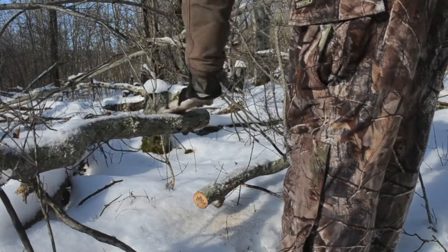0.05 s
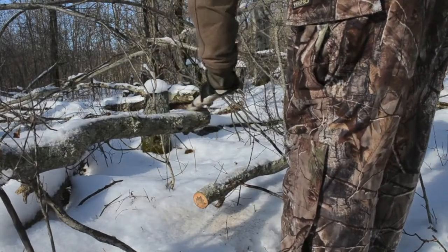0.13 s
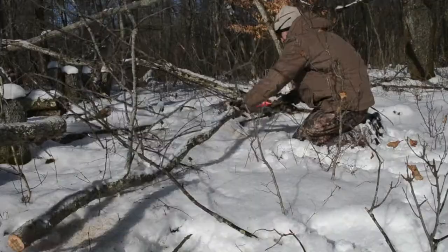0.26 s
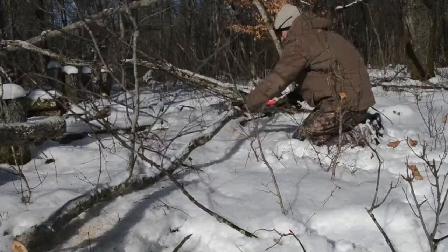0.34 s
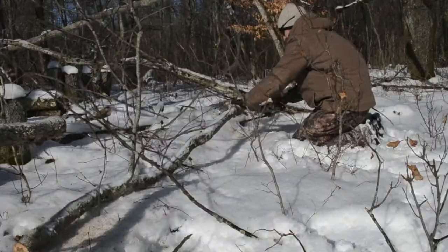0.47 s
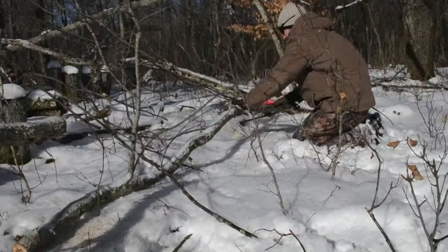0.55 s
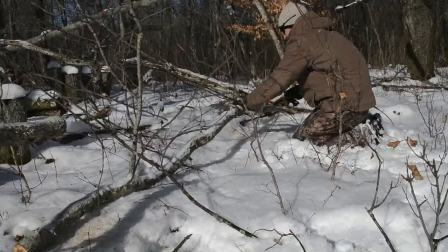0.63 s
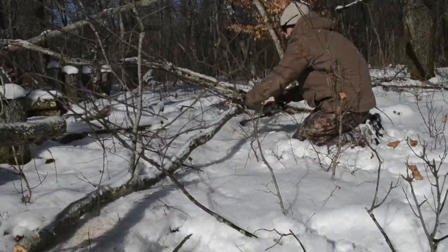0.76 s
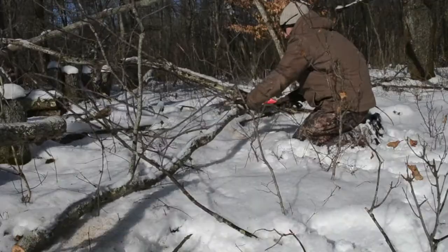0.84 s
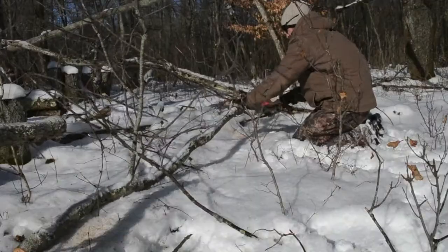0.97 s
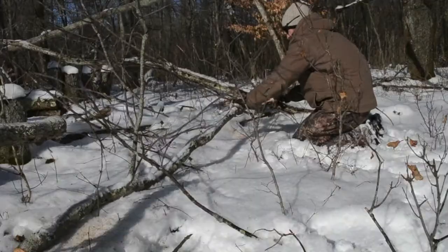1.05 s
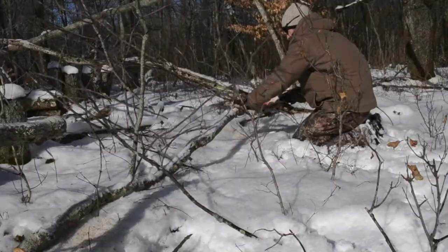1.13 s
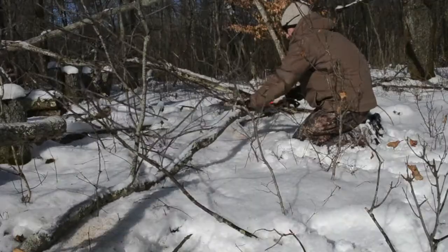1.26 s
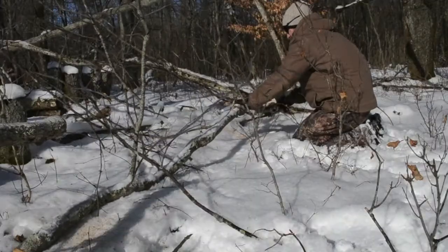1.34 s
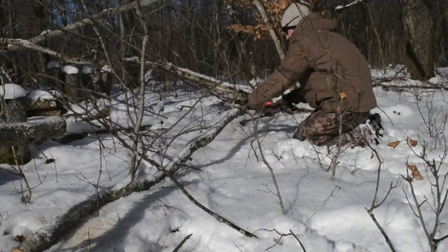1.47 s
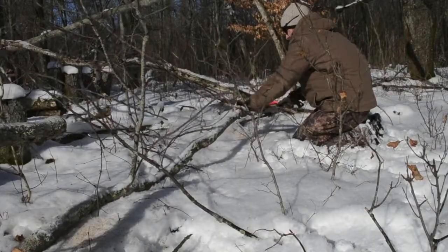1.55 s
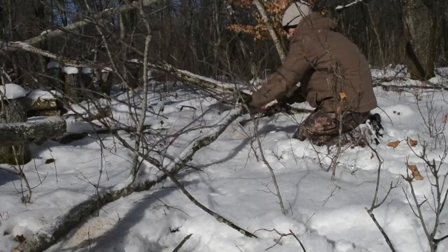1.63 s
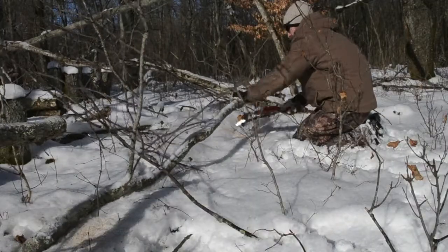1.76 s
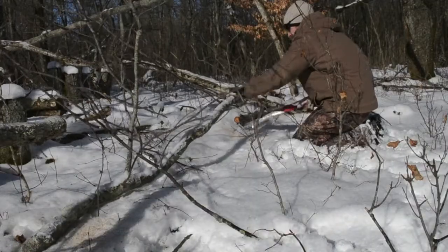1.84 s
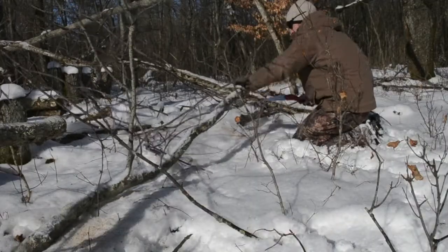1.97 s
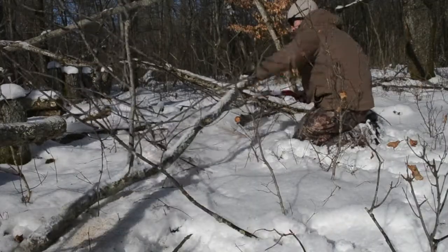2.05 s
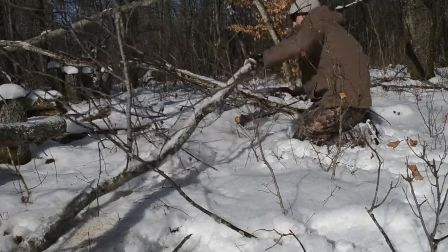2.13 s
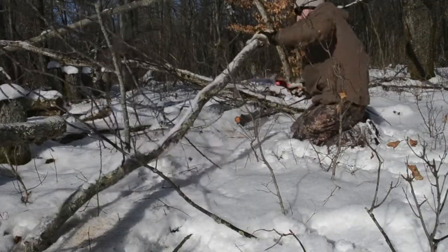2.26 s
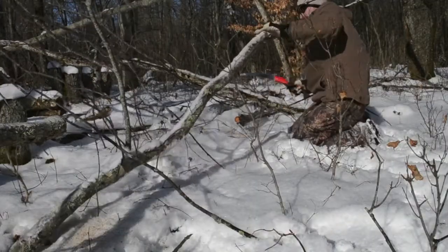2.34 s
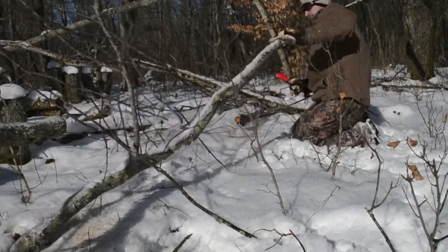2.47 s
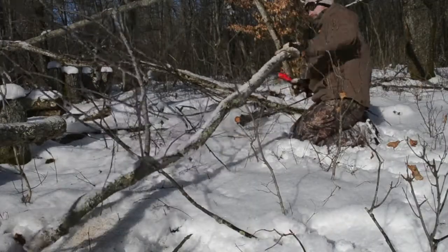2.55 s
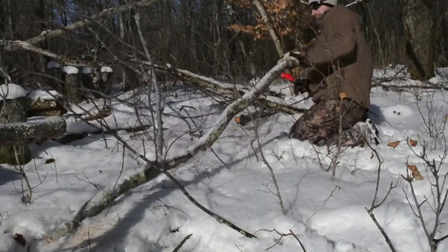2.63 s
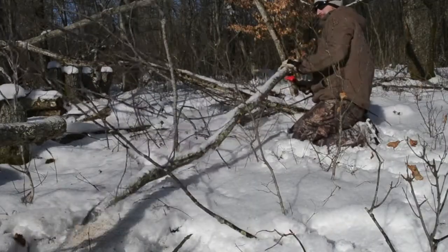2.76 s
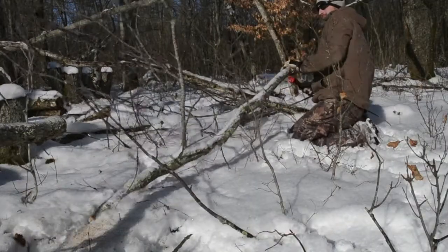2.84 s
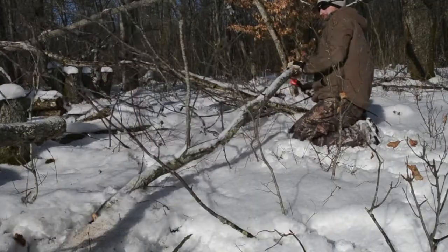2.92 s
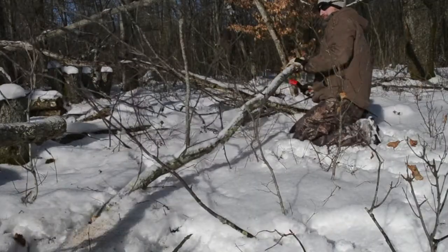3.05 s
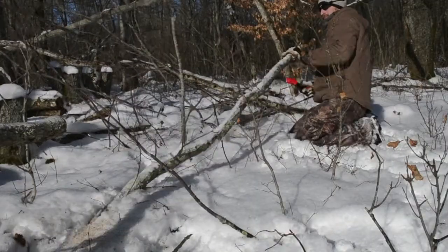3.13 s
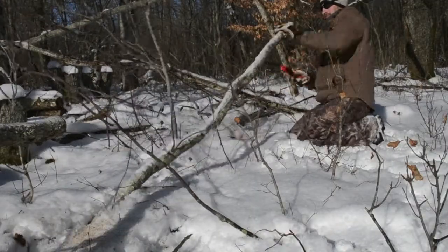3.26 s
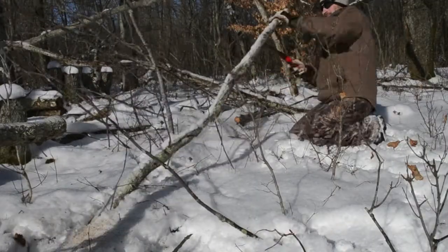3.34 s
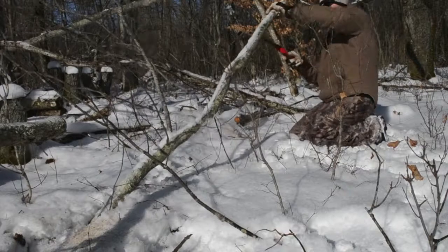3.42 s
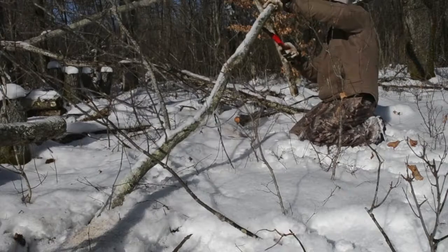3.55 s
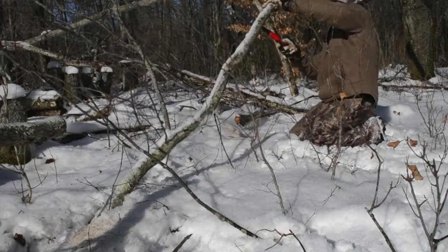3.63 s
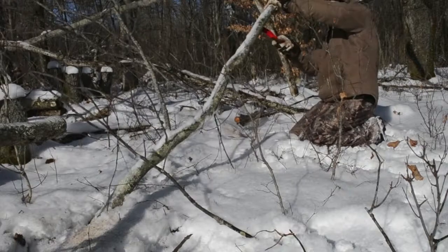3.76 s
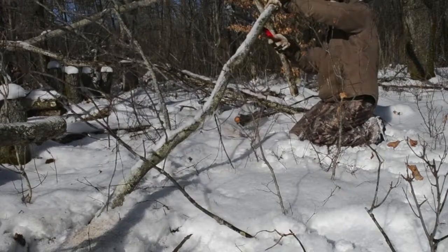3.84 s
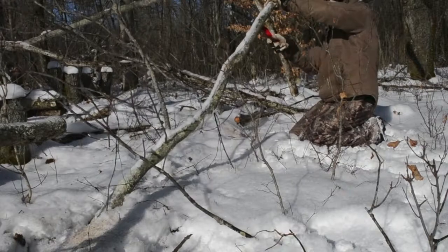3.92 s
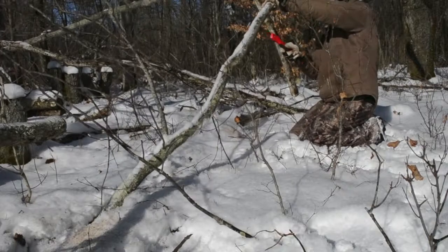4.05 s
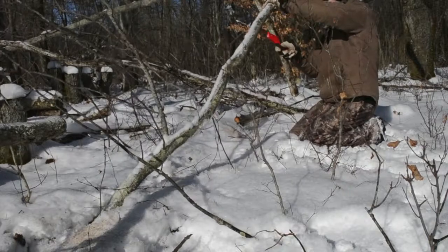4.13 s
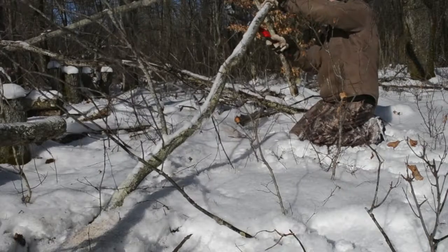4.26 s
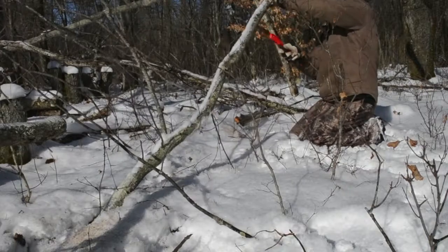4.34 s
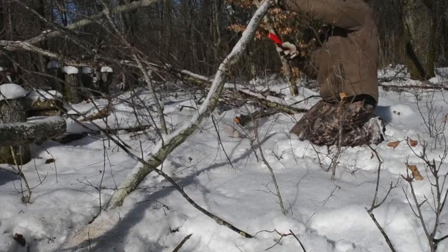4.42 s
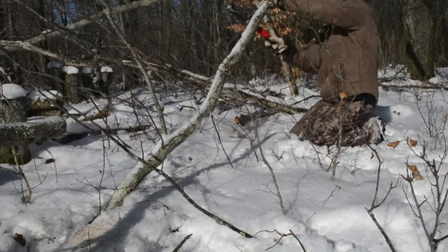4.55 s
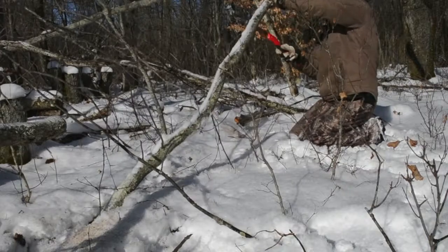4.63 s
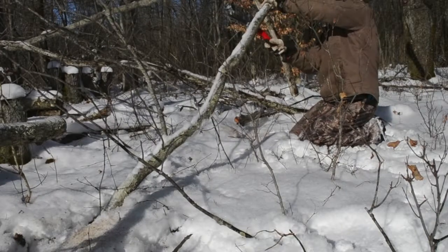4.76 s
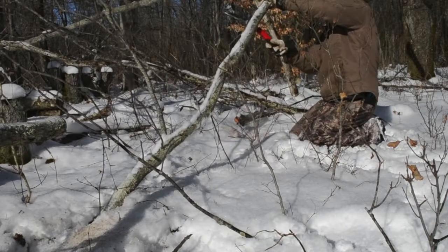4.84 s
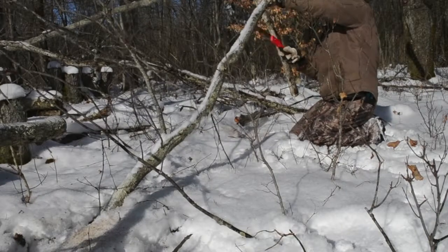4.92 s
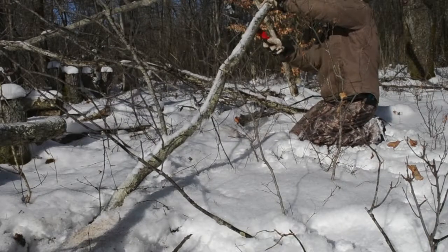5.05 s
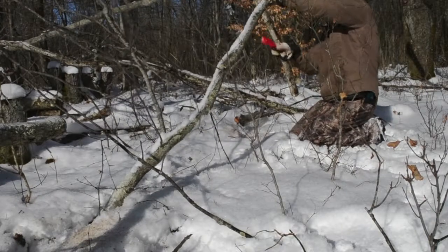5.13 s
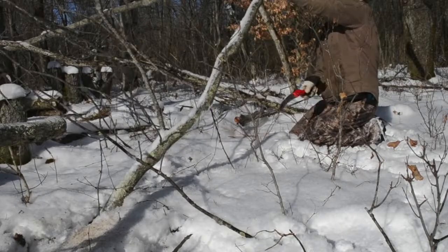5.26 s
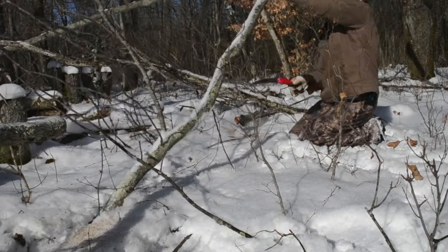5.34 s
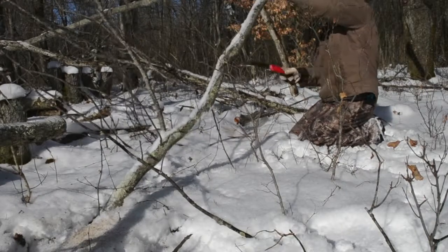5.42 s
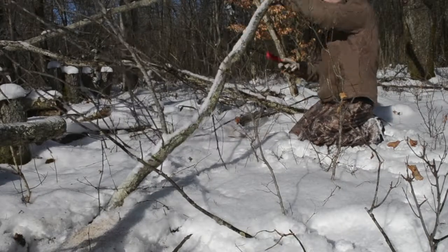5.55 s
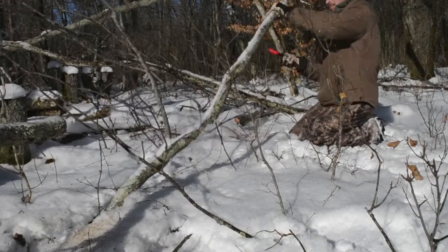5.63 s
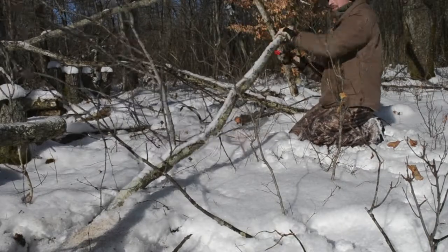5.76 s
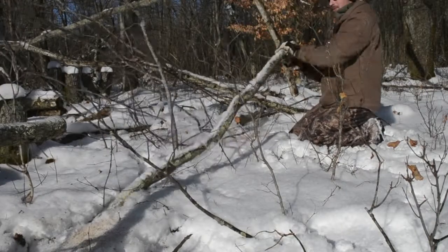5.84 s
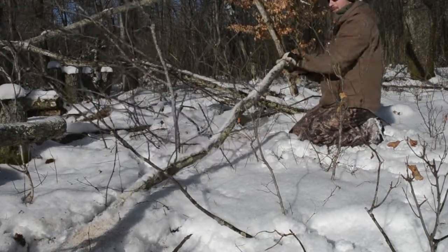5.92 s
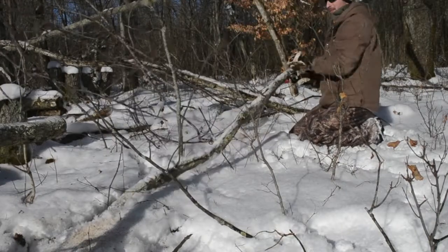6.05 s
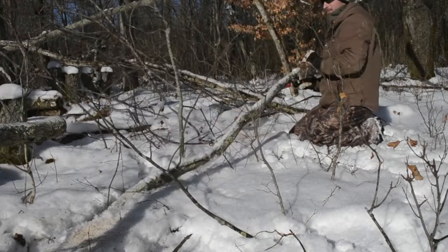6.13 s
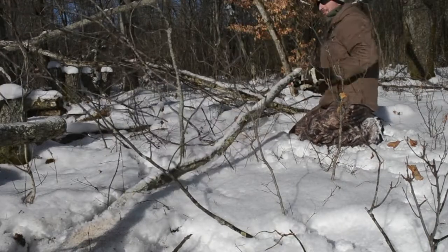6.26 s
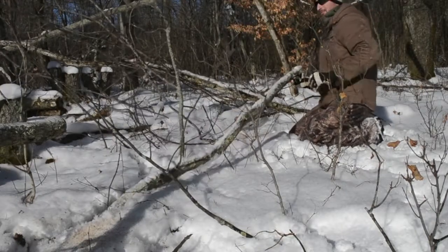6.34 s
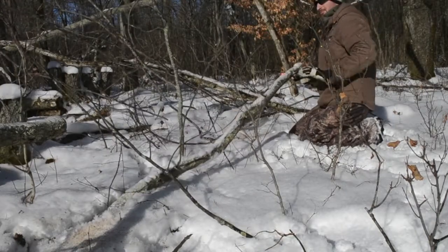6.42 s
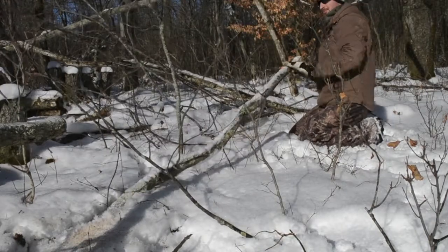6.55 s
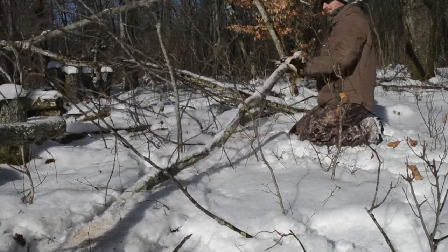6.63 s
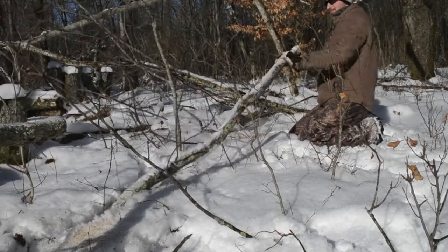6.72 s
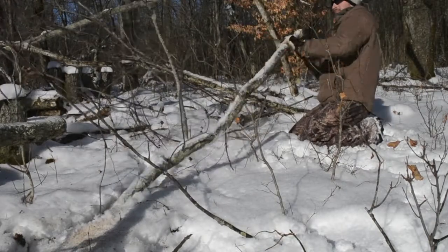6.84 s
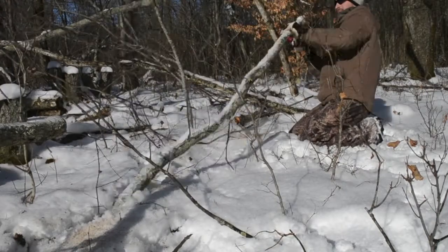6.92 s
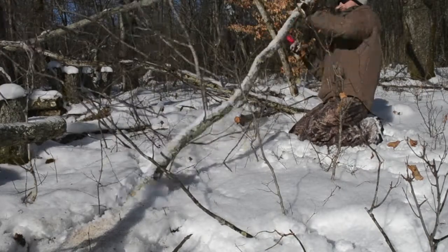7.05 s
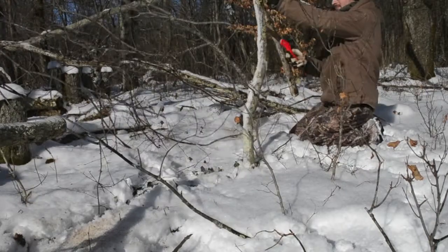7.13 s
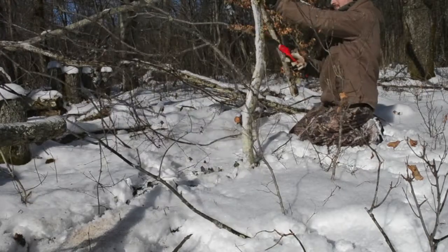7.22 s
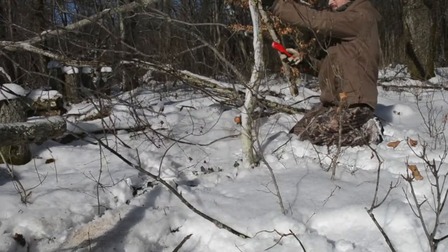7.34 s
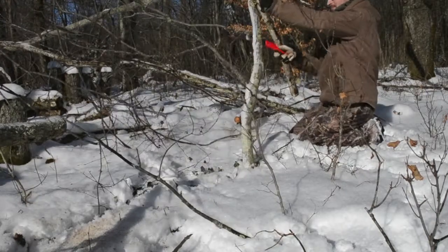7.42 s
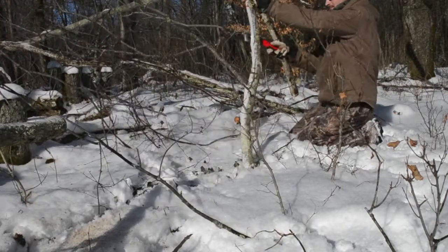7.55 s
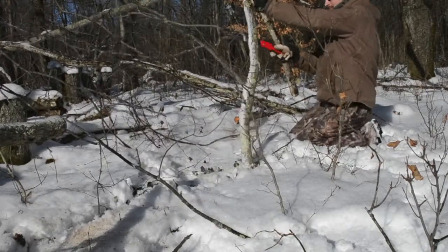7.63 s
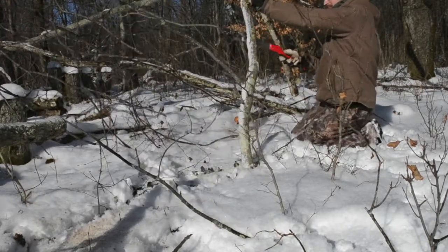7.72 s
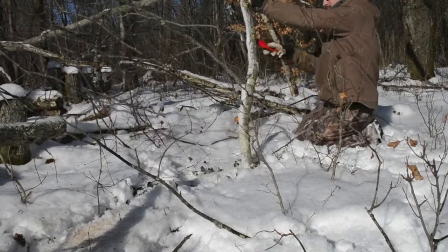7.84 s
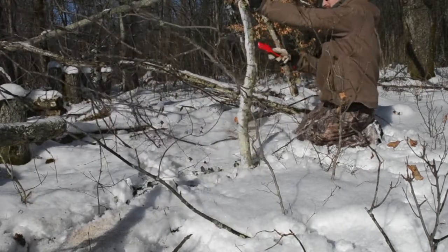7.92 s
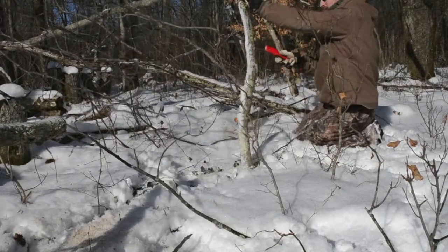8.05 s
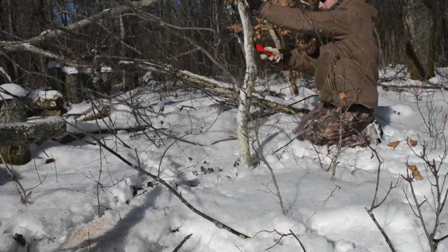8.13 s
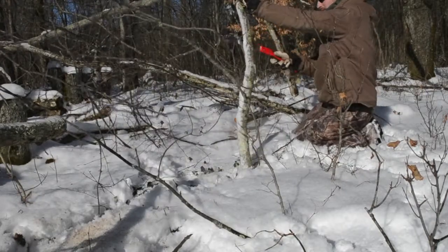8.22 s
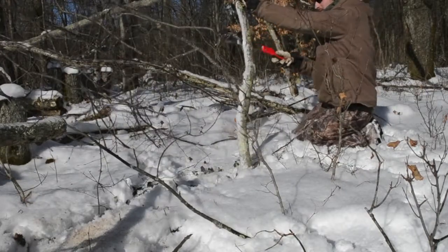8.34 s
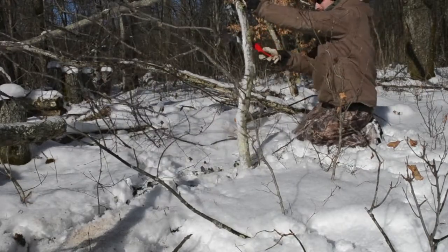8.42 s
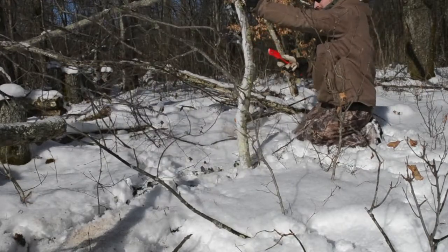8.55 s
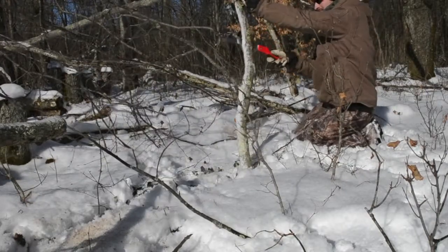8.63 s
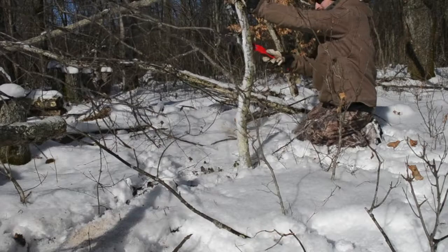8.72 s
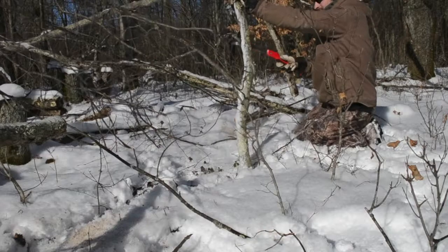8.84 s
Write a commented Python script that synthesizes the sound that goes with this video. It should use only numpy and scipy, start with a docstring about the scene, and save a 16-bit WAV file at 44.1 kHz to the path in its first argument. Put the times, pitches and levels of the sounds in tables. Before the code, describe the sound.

Quick back-and-forth sawing on a branch outdoors, pausing twice for cloth rustle, wood scraping on snow and sharp twig snaps.

```python
"""Folding saw on a dead branch in snowy woods: three cuts of quick pull and push strokes.
Teeth tear fibres and ring branch and blade. In the first two cuts each push groans; in the first
the blade also binds and jumps with loud cracks. Between cuts the branch is hauled over snow: a stiff
jacket swishes, twigs snap, wood knocks and creaks, the thin blade pings.
Faint air and a far drone behind; almost no echo."""
import sys
import numpy as np
from scipy import signal
from scipy.fft import rfft, irfft
from scipy.io import wavfile
from scipy.ndimage import uniform_filter1d

SR = 44100
rng = np.random.default_rng(int(sys.argv[2]) if len(sys.argv) > 2 else 0)


def wrap_up_sound(samples):
    """Save the sound to the file named by the first command line argument, as 16-bit audio."""
    columns = np.atleast_2d(samples).T
    # keep every value between -1 and 1, then stretch to whole-number steps
    tamed = np.clip(columns, -1, 1)
    steps = np.round(tamed * 32767).astype(np.int16)
    wavfile.write(sys.argv[1], SR, steps)


N = 391588
NFFT = 4096
HZ = np.fft.rfftfreq(NFFT, 1 / SR)
T = np.arange(N) / SR

# spectral envelopes (frequency [Hz], level [dB])
AIR_EQ = [(25, -22), (60, -15), (150, -10.5), (280, -8), (420, -8), (560, -4.5), (1000, -4.5), (2500, -25),
          (6000, -30), (10000, -16)]
ECHO_EQ = [(100, 4), (500, -1), (1200, -8.5), (2200, 0), (3500, -5.5), (9000, -12)]
SWISH_EQ = [(30, -33), (100, -19), (200, -11), (400, -10.5), (800, 1), (1200, 0.5), (1650, 3), (2400, 0.5),
            (4000, -0.5), (7000, -3.5), (9000, -4.5), (11000, -4.5), (13000, -59)]
SNAP_EQ = [(100, -30), (500, -6.5), (1400, -4), (3000, -4.5), (6000, -1.5), (9000, -3.5), (11000, -2.5),
           (13000, -21)]
KNOCK_EQ = [(50, -36), (160, -31), (330, -3), (500, 6), (750, 9), (1100, 1), (1600, -5.5), (2500, -14.5),
            (5000, -8), (11000, -98)]
CRACK_EQ = [(50, -43), (160, -21), (400, -12.5), (700, -7.5), (1200, -1.5), (2200, -4.5), (3700, -5),
            (4600, -4.5), (7000, -7.5), (10000, -7)]
RASP_EQ = [(40, -27), (90, -20.5), (160, -9), (280, -11.5), (450, -3), (900, 3), (1700, 4.5), (2500, 4.5),
           (4000, -3.5), (6000, -4), (7500, -4), (9000, -3), (11000, -5), (13000, -82)]
MIC_EQ = [(20, 2.5), (7300, -1), (7900, -5.5), (8300, -0.5), (9500, 0.5), (10200, -7.5), (10800, -18.5),
          (11300, -39)]

# resonances (frequency [Hz], width [Hz], lift [dB])
HUM_MODES = [(420, 155, 8)]
BLADE_MODES = [(4480, 150, 3), (4920, 150, 5.5), (5270, 150, 4.5), (5750, 140, 4.5), (6530, 150, 4.5),
               (7100, 180, 2), (8450, 400, 3), (9300, 350, 3)]
JUMP_MODES = [(904, 340, 16), (1520, 86, 3), (2020, 160, 13), (2430, 220, 12), (3400, 230, 7.5),
              (3670, 270, 10.5)]  # branch, struck by the jumping blade
BRANCH_MODES_1 = [(425, 180, 17), (810, 150, 9.5), (1010, 130, 11), (1560, 140, 9), (2100, 120, -15),
                  (5270, 1800, 6)]  # one set per cut: the branch gets shorter
BRANCH_MODES_2 = [(440, 50, 4.9), (824, 170, 13.8), (1028, 34, 20.3), (1382, 130, 17.5), (1640, 330, 10),
                  (2520, 160, 8.6), (3330, 300, 1.1)]
BRANCH_MODES_3 = [(445, 31, 8.4), (783, 27, 12.4), (1010, 91, 15), (1430, 220, 6.1), (1790, 200, 9.7),
                  (2250, 180, 2.3), (2570, 78, 2.7), (7970, 600, 1.3)]

# far drone (time [s], pitch [Hz])
DRONE_PITCH = [(0, 440), (2.0, 438), (5.4, 415), (6.2, 383), (7.4, 396), (8.88, 420)]
# arm and branch movements (start [s], length [s], relative level [dB], treble re body [dB])
HAULS = [(-0.2, 0.51, -51.5, 3.5), (0.158, 0.06, -47, -4.5), (1.59, 0.3, -60, 3), (1.803, 0.98, -52.5, -2),
         (2.334, 0.77, -45.5, -0.5), (3.022, 0.31, -53.5, -2), (3.129, 0.57, -53, 2),
         (3.77, 0.16, -57, -12), (5.084, 0.16, -46.5, -5.5), (5.022, 0.64, -58.5, 1),
         (5.591, 0.13, -52, -3), (5.61, 0.63, -56.5, -2), (6.483, 0.27, -55, -3.5),
         (6.728, 0.45, -47.5, -3.5), (7.017, 0.11, -47.5, 1), (7.15, 0.4, -74, 9), (7.38, 0.2, -57.5, -16)]
# wood pinching the blade or dragged over wood (start [s], length [s], initial pitch [Hz], level [dB])
CREAKS = [(4.436, 0.036, 1050, -41.5), (5.628, 0.054, 1300, -54), (5.92, 0.025, 1270, -51),
          (5.983, 0.054, 1070, -55), (6.514, 0.04, 1250, -56)]
# blade pings and wood chirps (time [s], pitch [Hz], relative level [dB], t60 [s])
PINGS = [(1.625, 4930, -38.5, 0.093), (1.672, 4900, -44, 0.15), (1.752, 4900, -46, 0.18),
         (2.511, 1630, -31, 0.034), (2.992, 2000, -40, 0.044), (3.876, 1580, -36.5, 0.029),
         (5.176, 6300, -41, .12), (5.640, 1940, -42, 0.062), (7.452, 5620, -52, 0.16),
         (7.454, 4930, -47, 0.097)]
# twigs breaking, teeth catching (time [s], impulse level [dB], splinter re impulse [ratio])
SNAPS = [(0.784, -27.5, 0.18), (0.92, -30.5, 0.08), (1.286, -32, 0.087), (1.6282, -27, .1),
         (1.6703, -20, 0.25), (1.6929, -12.5, 0.059), (2.109, -31.5, .1), (2.221, -22, 0.086),
         (2.3997, -23, 0.11), (2.507, -24, 0.087), (2.9743, -27, 0.15), (3.1036, -33, 0.15),
         (3.4038, -24.5, .08), (3.475, -23, 0.083), (3.7258, -26, 0.11), (3.9148, -19, 0.052),
         (5.176, -21.5, 0.19), (5.2677, -26.5, 0.1), (5.892, -24.5, 0.043), (6.2638, -33.5, 0.11),
         (6.676, -14.5, .04), (6.926, -20, 0.13), (7.4266, -30, 0.11), (7.9149, -23.5, 0.15),
         (8.0698, -26, 0.11), (8.1998, -22, 0.12), (8.6333, -29, .12)]
# handle and wood knocks (time [s], relative level [dB], pitch [ratio])
KNOCKS = [(0.3119, -38, 1.08), (.584, -38.5, 1.25), (1.231, -36, 1.6), (1.399, -44, 0.7),
          (1.657, -49, 0.38), (2.511, -45.5, 3.9), (3.226, -58, 0.21), (3.851, -51.5, 0.98),
          (4.222, -39, 1.08), (4.516, -33.5, 1.13), (4.797, -37.5, 1.3), (5.088, -40, 1.12),
          (5.114, -41.5, 1.9), (5.292, -49.5, 1.37), (6.466, -54, 1.7), (6.506, -44.5, 1.84),
          (6.677, -33.5, 1.86), (6.926, -42.5, 2.1), (7.079, -50, 1.8)]
# bound blade chattering free (time [s], relative level [dB], hold [s])
JUMPS = [(0.311, -38, 0.0056), (0.5815, -23, 0.0037), (0.8634, -29, 0.0056), (1.2012, -32.5, 0.0061),
         (1.228, -30.5, 0.004), (1.66, -45.5, 0.02)]
# brief level dips (centre [s], depth [dB], half width [s])
DIPS = [(.266, 44, .019), (7.151, 26, .013)]

# strokes per cut, alternating, pull first (blade turn [s], effort [dB])
CUT_1 = [(0.278, -54), (0.35, -49), (0.488, -45), (0.655, -49.5), (0.762, -45.5), (0.93, -54.5),
         (1.098, -51), (1.29, -55), (1.422, -48), (1.57, -55.5)]
CUT_2 = [(3.955, -43), (4.108, -46), (4.257, -39.5), (4.413, -44), (4.548, -40.5), (4.696, -45),
         (4.821, -38), (4.972, -41.5)]
CUT_3 = [(7.61, -45.5), (7.765, -48), (7.895, -43.5), (8.042, -48.5), (8.178, -43), (8.326, -45),
         (8.456, -44.5), (8.602, -45.5), (8.724, -43.5)]
# pull row, push row: a pull bites, a push rides on the wood and thrums; levels re effort
# (speed peak [share of stroke], branch thrum [dB], wood rasp [dB], tooth hiss [dB])
FEEL_1 = [(.4, -13.5, 0, 1.5), (0.561, -4, 1, 2.5)]
FEEL_2 = [(.64, -15, -0.11, 0.6), (.62, -13.5, -0.53, -0.5)]
FEEL_3 = [(.6, -15.5, -.2, 4.46), (.62, -9.5, -0.23, 2.9)]


def gain_of(db):
    """dB to amplitude."""
    return 10 ** (np.asarray(db) / 20)


def unit_rms(x):
    """Scale to rms 1."""
    return x / np.sqrt(np.mean(x ** 2) + 1e-20)


def add(mix, start_s, sound):
    """Mix a sound in, in place."""
    part = mix[max(round(start_s * SR), 0):][:len(sound)]
    part += sound[:len(part)]


def spectrum(points, pitch=1):
    """Gain curve from (Hz, dB) points, frequencies scaled by pitch."""
    hz, db = np.transpose(points)
    return gain_of(np.interp(np.log(HZ + 1), np.log(hz * pitch + 1), db))


def resonances(modes):
    """Gain curve of peaks on a flat response."""
    peaks = sum(gain_of(2 * db) / (1 + (2 * (HZ - hz) / width_hz) ** 2) for hz, width_hz, db in modes)
    return np.sqrt(1 + peaks)


def ripple(depth_db, spacing_hz):
    """Random gain curve of many close, weak modes."""
    knots_hz = np.arange(0, SR / 2, spacing_hz)
    return gain_of(depth_db * np.interp(HZ, knots_hz, rng.standard_normal(len(knots_hz))))


def ring(gain):
    """Minimum-phase impulse response of a gain curve."""
    log_gain = np.log(np.maximum(gain, 1e-5))
    mirrored = np.concatenate([log_gain, log_gain[-2:0:-1]])
    return np.fft.ifft(np.exp(np.conj(signal.hilbert(mirrored)))).real[:NFFT // 2]


def through(x, gain):
    """Filter by a gain curve normalised to unit energy."""
    response = ring(gain)
    return signal.oaconvolve(x, response / np.linalg.norm(response))[:len(x)]


def resonate(x, hz, stage_width_hz):
    """Two unity-gain resonators in series, tracking the curve hz."""
    carrier = np.exp(2j * np.pi * np.cumsum(hz) / SR)
    pole = np.exp(-np.pi * stage_width_hz / SR)
    for _ in range(2):
        x = 2 * (carrier * signal.lfilter([1 - pole], [1, -pole], x / carrier)).real
    return x


def wander(rate_hz):
    """Low-passed noise, rms 1."""
    rolloff = 1 + (np.fft.rfftfreq(N, 1 / SR) / rate_hz) ** 4
    return unit_rms(irfft(rfft(rng.standard_normal(N)) / rolloff, N))


def grains(per_s, spread_db):
    """Sparse clicks, a few large; rms 1."""
    size = gain_of(spread_db * np.minimum(rng.exponential(1, N), 4))
    return unit_rms(size * rng.choice([-1, 1], N) * (rng.random(N) < per_s / SR))


def swing(t, start_s, end_s, peak_share):
    """Arm angle, 0 to pi; its sine is the speed, greatest at peak_share."""
    return np.pi * np.interp((t - start_s) / (end_s - start_s), [0, peak_share, 1], [0, .5, 1])


def air(level_db=-66, swell_db=1):
    """Air among the trees, with a far hum."""
    noise = through(rng.standard_normal(N), spectrum(AIR_EQ) * resonances(HUM_MODES))
    return gain_of(level_db + swell_db * wander(2.3)) * noise


def drone(level_db=-75.5, swell_db=3.5):
    """Far fuzzy tone, perhaps traffic; comes and goes."""
    hz = np.interp(T, *np.transpose(DRONE_PITCH))
    tone = resonate(rng.standard_normal(N), hz, stage_width_hz=46)
    return gain_of(level_db + swell_db * wander(3.4)) * unit_rms(tone)


def trunk_echo(x, gain_db=-14, t60_s=0.31, rise_s=0.0058):
    """Snow absorbs most sound; trunks scatter a short, dull echo."""
    t = T[:SR // 2]
    scatter = rng.standard_normal(len(t)) * gain_of(-60 * t / t60_s) * np.minimum(t / rise_s, 1) ** 2
    echo = signal.oaconvolve(x, scatter / np.linalg.norm(scatter))[:N]
    return gain_of(gain_db) * signal.oaconvolve(echo, ring(spectrum(ECHO_EQ)))[:N]


def jacket(cuts, sawing_db=-60, resting_db=-62, flutter_db=1.5):
    """Constant cloth rustle, louder while the arm saws."""
    in_cut = sum((T > strokes[0][0]) & (T < strokes[-1][1]) for strokes in cuts)
    busy = uniform_filter1d(in_cut.astype(float), size=800)
    cloth = unit_rms(rng.standard_normal(N) + .5 * grains(500, 4))
    level = gain_of(resting_db + (sawing_db - resting_db) * busy + flutter_db * wander(18))
    return level * through(cloth, spectrum(SWISH_EQ))


def haul_envelopes(peak_share=0.53, speed_exponent=1.73):
    """Body and treble amplitudes follow arm speed; overlapping movements add in power."""
    body_power, treble_power = np.zeros((2, N))
    for start_s, length_s, db, treble_db in HAULS:
        end_s = start_s + length_s
        speed = abs(np.sin(swing(T[:int(end_s * SR)], start_s, end_s, peak_share)))
        level = gain_of(db) * speed ** speed_exponent
        add(body_power, 0, level ** 2)
        add(treble_power, 0, (level * gain_of(treble_db)) ** 2)
    return np.sqrt(body_power), np.sqrt(treble_power)


def hauling(body_env, treble_env, body_db=-2, treble_db=1, flutter_db=1.8, split_hz=3500):
    """Cloth rubs, bark scrapes over crusted snow: a grainy swish."""
    flutter = gain_of(flutter_db * wander(34))
    high_share = 1 / (1 + (split_hz / (HZ + 1)) ** 6)
    crust = 0.59 * grains(1500, 5.4)
    coarse = unit_rms((rng.standard_normal(N) + crust) * flutter)
    ice = .35 * grains(200, 3.5)
    fine = unit_rms((rng.standard_normal(N) + crust + ice) * flutter)
    scrape = through(coarse, spectrum(SWISH_EQ) * np.sqrt(1 - high_share))
    fizz = through(fine, spectrum(SWISH_EQ) * np.sqrt(high_share))
    return gain_of(body_db) * body_env * scrape + gain_of(treble_db) * treble_env * fizz


def twig_ticks(motion, gain_db=-58, ticks_per_s=40, splinter_s=0.0023, count=6):
    """Brushed twigs tick at random, each with its own ring, harder as the branch moves faster."""
    out, t = np.zeros(N), T[:NFFT]
    for _ in range(count):
        tick = (t == 0) + 0.17 * rng.standard_normal(NFFT) * np.exp(-t / splinter_s)
        ticks = signal.oaconvolve(grains(ticks_per_s / count, 1.3), tick)[:N]
        out += through(ticks, spectrum(SNAP_EQ) * ripple(3, 900))
    force = (0.013 + motion / motion.max()) ** 0.2
    return gain_of(gain_db) * force * unit_rms(out)


def stick_slip(length_s, start_hz, glide_ratio, db):
    """Stick-slip friction drives one gliding bending mode of the branch."""
    hz = np.geomspace(start_hz, start_hz * glide_ratio, int(length_s * SR))
    slips = rng.standard_normal(SR // 4)[:len(hz)]
    mode = resonate(slips, hz, stage_width_hz=0.3 * start_hz)
    return gain_of(db) * unit_rms(mode) * signal.windows.tukey(len(hz), .7)


def creaks(glide_ratio=0.67):
    """Single wood creaks, falling in pitch."""
    out = np.zeros(N)
    for start_s, length_s, hz, db in CREAKS:
        add(out, start_s, stick_slip(length_s, hz, glide_ratio, db))
    return out


def pings(gain_db=-1, rise_s=0.0023, roughness=0.27):
    """One mode of blade or wood swells and decays, roughened by rubbing."""
    out, t = np.zeros(N), T[:SR // 3]
    for start_s, hz, db, t60_s in PINGS:
        envelope = gain_of(db + gain_db - 60 * t / t60_s) * (1 - np.exp(-t / rise_s))
        add(out, start_s, envelope * np.sin(2 * np.pi * hz * t))
    return out * (1 + roughness * wander(150))


def snaps(tear=0.14, tear_s=0.0015, splinter_s=0.0073):
    """A twig breaks at once; its last fibres splinter after."""
    out, t = np.zeros(N), T[:NFFT]
    for start_s, db, splinter in SNAPS:
        envelope = tear * np.exp(-t / tear_s) + splinter * np.exp(-t / splinter_s)
        fibres = rng.standard_normal(NFFT) * envelope
        add(out, start_s, gain_of(db) * ((t == 0) + fibres))
    return through(out, spectrum(SNAP_EQ) * resonances(BLADE_MODES))


def knocks(gain_db=23, rattle=0.073, rattle_s=0.0033):
    """A blow on dead wood, then a short rattle."""
    out, t = np.zeros(N), T[:NFFT]
    for start_s, db, pitch in KNOCKS:
        blow = (t == 0) + rattle * rng.standard_normal(NFFT) * np.exp(-t / rattle_s)
        add(out, start_s, gain_of(db + gain_db) * through(blow, spectrum(KNOCK_EQ, pitch)))
    return out


def strokes_of(cut, feel, stop_s, overlap_s=.005):
    """Stroke rows (start [s], end [s], speed peak [share], effort [dB], three band levels [dB])."""
    ends_s = [turn_s for turn_s, _ in cut[1:]] + [stop_s]
    strokes = []
    for k, ((turn_s, effort_db), end_s) in enumerate(zip(cut, ends_s)):
        peak_share, *offsets_db = feel[k % 2]
        bands_db = effort_db + np.array(offsets_db)
        # teeth still scrape either side of a turn
        strokes.append((turn_s - overlap_s, end_s + overlap_s, peak_share, effort_db, bands_db))
    return strokes


def groans(strokes, start_hz, glide_ratio, gain_db, stroke_share=0.32):
    """The blade's flank rubs the groove around the speed peak of each push."""
    out = np.zeros(N)
    for start_s, end_s, peak_share, effort_db, _ in strokes[1::2]:
        length_s = stroke_share * (end_s - start_s)
        peak_s = start_s + peak_share * (end_s - start_s)
        add(out, peak_s - length_s / 2, stick_slip(length_s, start_hz, glide_ratio, effort_db + gain_db))
    return out


def blade_jumps(gain_db=3, fade_s=0.0036):
    """The bound blade skips several teeth and cracks against the branch."""
    out, t = np.zeros(N), T[:NFFT]
    for start_s, db, hold_s in JUMPS:
        chatter = rng.standard_normal(NFFT) * np.exp(-np.maximum(t - hold_s, 0) / fade_s)
        add(out, start_s, gain_of(db + gain_db) * chatter)
    return through(out, spectrum(CRACK_EQ) * resonances(JUMP_MODES))


def tip_reflection(rasp, t, position, reflected=.55, min_delay_s=.0009, sweep_s=.0009):
    """Treble returns from the blade's tip; the delay follows the free length."""
    in_steel = signal.lfilter(*signal.butter(2, 3000, "high", fs=SR), rasp)
    return reflected * np.interp(t - min_delay_s - sweep_s * position, t, in_steel)


def sawing(strokes, modes, tooth_hz, bite_share, chips, grab_db, speed_exponent):
    """Teeth tear fibres at a rate that follows blade speed; branch and blade ring with it."""
    tearing = rng.standard_normal(N) + chips * grains(5000, 1.7)
    tearing *= gain_of(grab_db * wander(96))  # grab and slip in uneven grain
    jitter = 1 + .08 * wander(40)
    thrum_band = 1 / (1 + (HZ / 600) ** 8)
    hiss_band = 1 / (1 + (3000 / (HZ + 1)) ** 8)
    bands = [thrum_band, np.maximum(1 - thrum_band - hiss_band, 0), hiss_band]
    out = np.zeros(N)
    for k, (start_s, end_s, peak_share, _, bands_db) in enumerate(strokes):
        span = slice(int(start_s * SR), int(end_s * SR))
        angle = swing(T[span], start_s, end_s, peak_share)
        speed = abs(np.sin(angle))
        position = (1 - (-1) ** k * np.cos(angle)) / 2  # out and back in turn
        tooth_phase = (np.cumsum(tooth_hz * speed * jitter[span]) / SR) % 1
        rasp = tearing[span] * (0.39 + np.exp(-tooth_phase / bite_share))  # bite, then slide
        rasp += tip_reflection(rasp, T[span], position)
        detune = 1 + 0.031 * (2 * rng.random() - 1)  # the grip retunes the branch
        branch = resonances([(hz * detune, width_hz, db) for hz, width_hz, db in modes])
        body = spectrum(RASP_EQ) * branch * resonances(BLADE_MODES)
        body *= ripple(2.3, 60)  # weak modes shift with the contact point
        colour = sum(gain_of(db) * unit_rms(band * body) for db, band in zip(bands_db, bands))
        add(out, start_s, signal.oaconvolve(unit_rms(rasp) * speed ** speed_exponent, ring(colour)))
    return out


def scene():
    """Three cuts, handling and background; mono."""
    first = strokes_of(CUT_1, FEEL_1, stop_s=1.662)
    second = strokes_of(CUT_2, FEEL_2, stop_s=5.11)
    third = strokes_of(CUT_3, FEEL_3, stop_s=8.865)
    saw = sawing(first, BRANCH_MODES_1, tooth_hz=607, bite_share=0.71,
                 chips=0.47, grab_db=2.75, speed_exponent=1.64)
    saw += groans(first, start_hz=315, glide_ratio=0.54, gain_db=-10)
    saw += blade_jumps()
    saw += sawing(second, BRANCH_MODES_2, tooth_hz=900, bite_share=0.33,
                  chips=0.28, grab_db=2.2, speed_exponent=1.75)
    saw += groans(second, start_hz=1000, glide_ratio=1.03, gain_db=-6)
    saw += sawing(third, BRANCH_MODES_3, tooth_hz=859, bite_share=0.41,
                  chips=0.35, grab_db=2.0, speed_exponent=1.62)
    body_env, treble_env = haul_envelopes()
    handling = knocks() + snaps() + pings() + creaks() + jacket([first, second, third])
    dragging = hauling(body_env, treble_env) + twig_ticks(treble_env)
    work = saw + handling + dragging
    return (work + trunk_echo(work) + air() + drone())[None]


def record(dry, cutoff_hz=11250):
    """Microphone colour, two brief level dips, low-pass."""
    coloured = signal.oaconvolve(dry, ring(spectrum(MIC_EQ))[None])[:, :N]
    dip_db = sum(db * np.maximum(1 - abs(T - centre_s) / half_s, 0) for centre_s, db, half_s in DIPS)
    lowpass = signal.firwin(511, cutoff_hz, window=("kaiser", 9), fs=SR)
    return signal.oaconvolve(coloured * gain_of(-dip_db), lowpass[None], "same")


dry = scene()
out = record(dry)
wrap_up_sound(out)
```